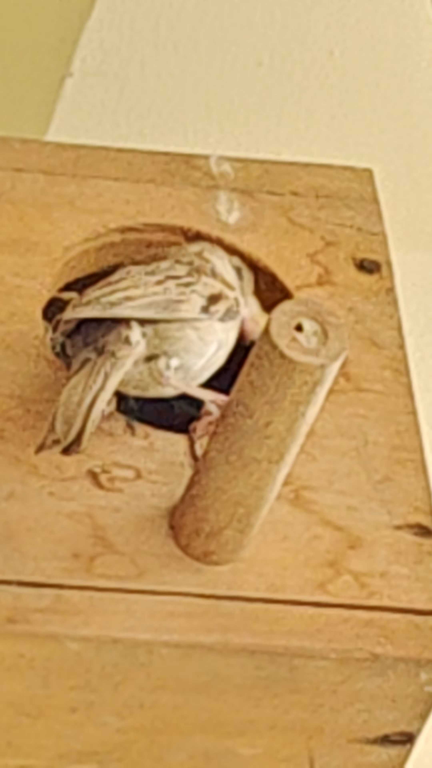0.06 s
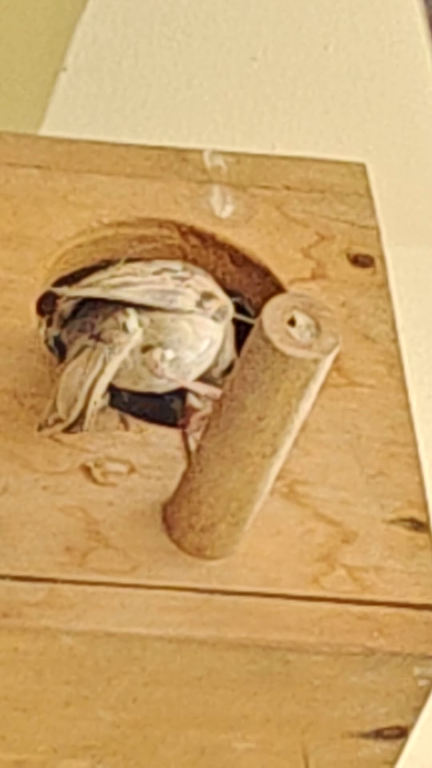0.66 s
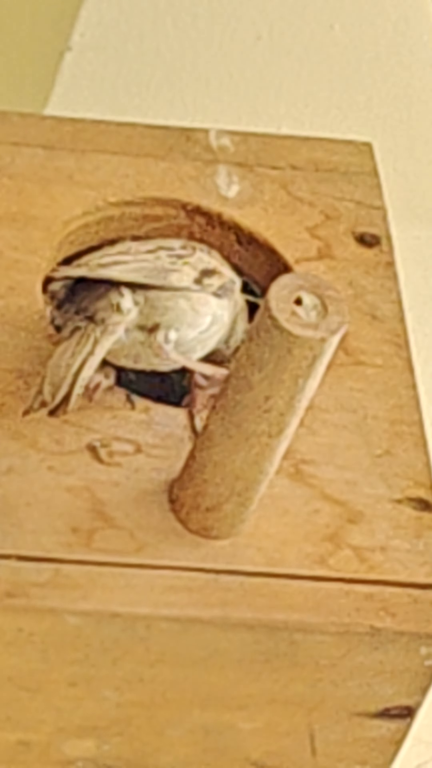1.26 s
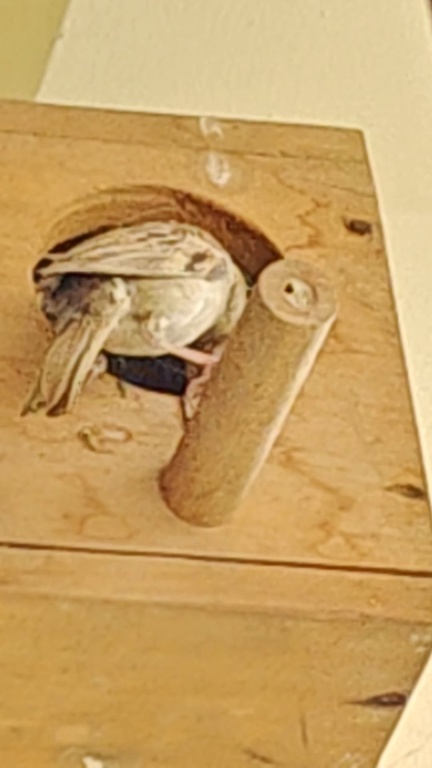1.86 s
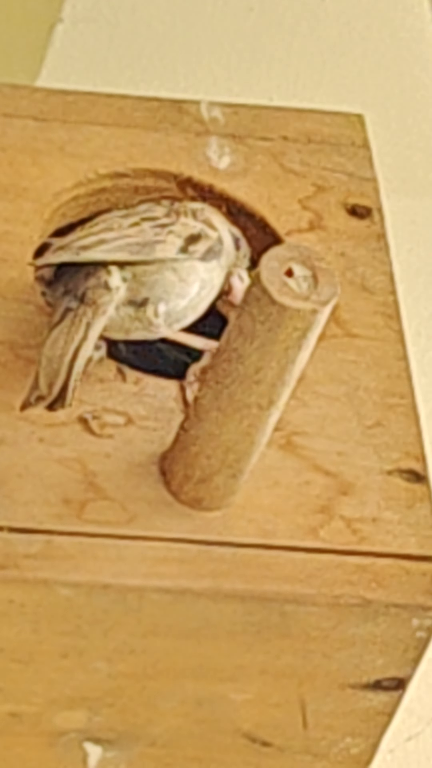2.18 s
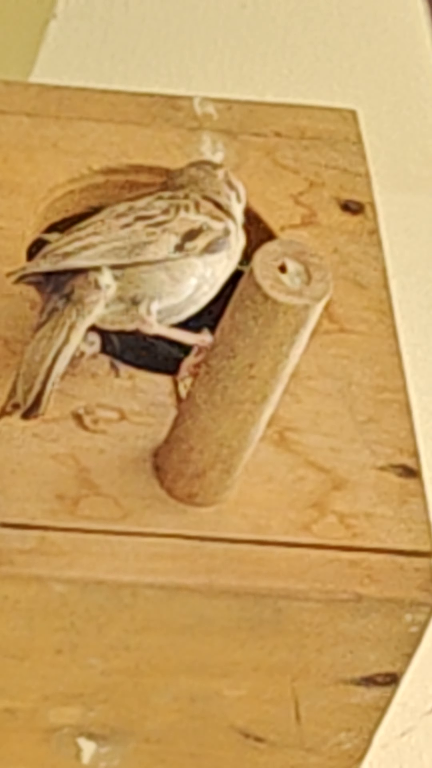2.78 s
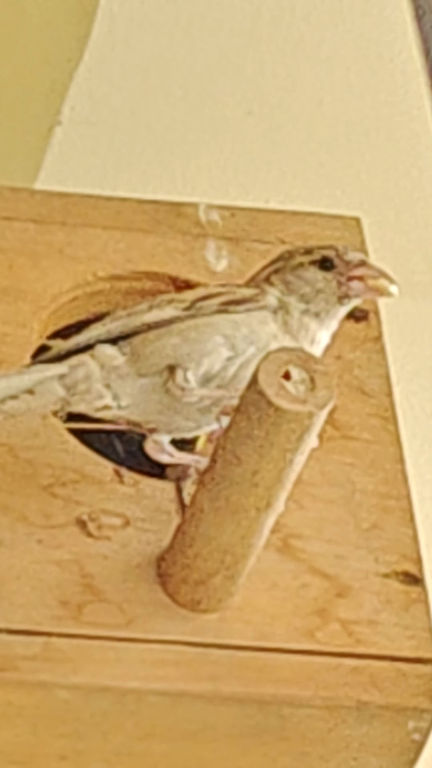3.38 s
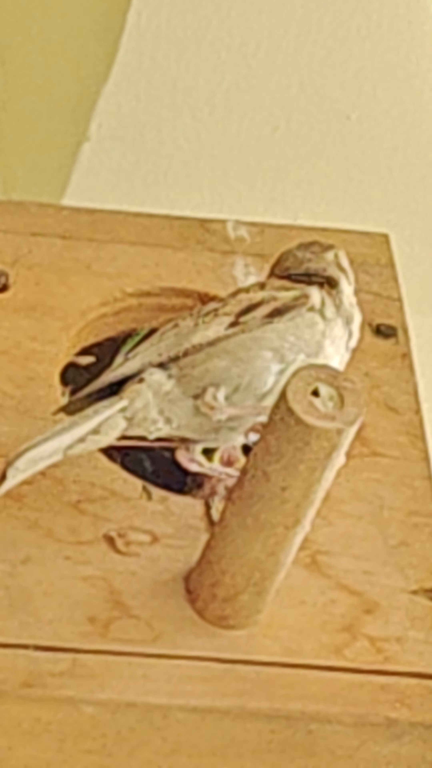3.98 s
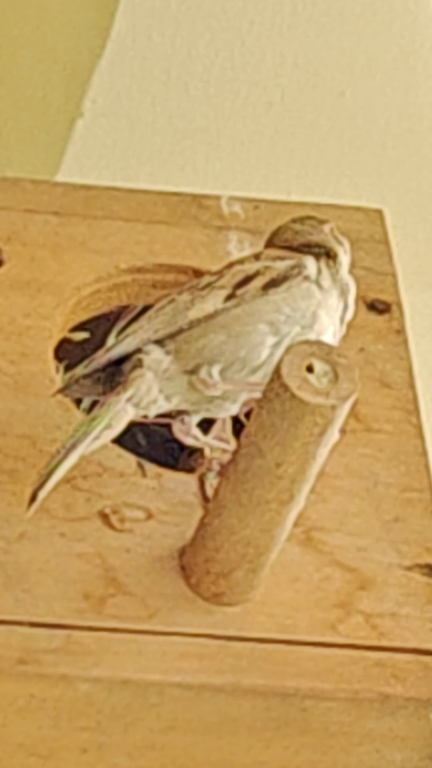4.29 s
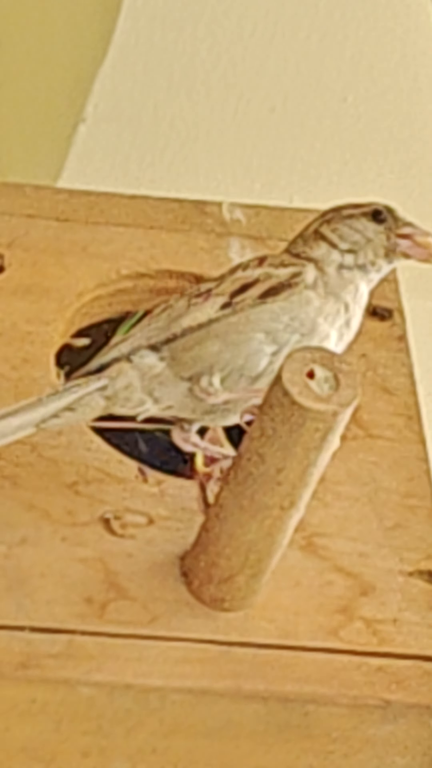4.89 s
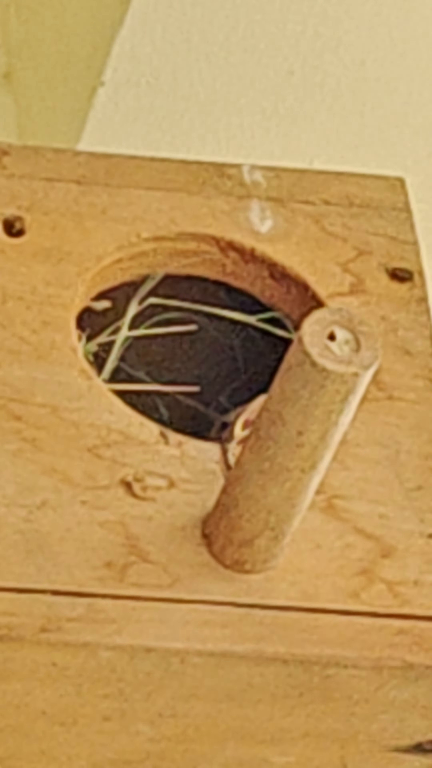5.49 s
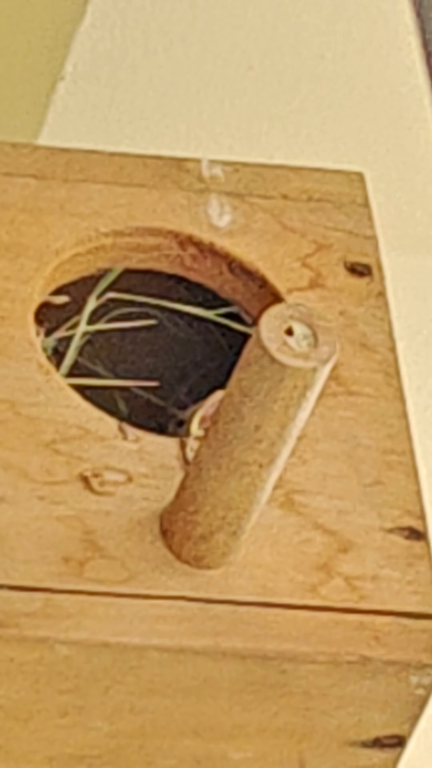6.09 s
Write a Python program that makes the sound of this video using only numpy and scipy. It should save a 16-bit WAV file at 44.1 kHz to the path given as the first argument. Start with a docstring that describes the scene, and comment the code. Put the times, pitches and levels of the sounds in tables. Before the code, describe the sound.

Close to a wooden nest box outdoors, baby sparrows give spaced, high, scratchy chirps and peeps with a slight boxy ring. A parent's claws tick faintly on the wood and thin pips sound farther off. Midway, quick rasping churrs start crowding in between the chirps. Two dull, soft bumps occur, and another bird gives one faint downward whistle near the end. A low rumble and distant machine hum stay underneath.

```python
"""Hoarse chirps and single peeps ring from a wooden nest box under a roof: sparrow nestlings are begging.
Each syllable is a frequency-modulated whistle of the syrinx, with turbulent hiss. Two patterns of chirp
repeat; from about halfway, raspy churrs join in. Reflections from the box and the walls smear the calls.
A parent's claws tick at the hole; two soft thumps, thin pips and one falling whistle in the open sound
over a faint outdoor rumble and hum."""
import sys
import numpy as np
from scipy import signal
from scipy.fft import rfft, irfft, next_fast_len
from scipy.io import wavfile
from scipy.ndimage import uniform_filter1d, map_coordinates

SR = 44100
rng = np.random.default_rng(int(sys.argv[2]) if len(sys.argv) > 2 else 0)


def wav_record(signal):
    """Record a signal, one row per channel, as 16-bit PCM in the file named by sys.argv[1]."""
    frames = np.transpose(np.atleast_2d(signal))
    bounded = np.clip(frames, -1, 1)
    # unit amplitude maps onto the largest positive 16-bit level
    quanta = np.round(bounded * 32767).astype(np.int16)
    wavfile.write(sys.argv[1], SR, quanta)


N = 275606

# gently falling pitch contour of squeaks and thin pips: length_share, pitch_ratio
FALL_SHAPE = [(0, 1.07), (.4, 1.0), (1, .94)]


def syrinx(length, hz, hoarse, shape, harmonics_db, jitter, rise, fall, flutter_rate=1300, shimmer=0.49):
    """A gliding harmonic tone and its envelope; random frequency and amplitude modulation make it hoarse."""
    count = int(length * SR)
    progress = np.linspace(0, 1, count)
    contour = uniform_filter1d(np.interp(progress, *np.transpose(shape)), size=160)
    wobble = 0.0239 * np.sqrt(2 * hoarse) * wander(count, 302)
    flutter = jitter * hoarse * wander(count, flutter_rate)
    pitch = hz * contour * (1 + wobble + flutter)
    phase = 2 * np.pi * np.cumsum(pitch) / SR
    tone = np.zeros(count)
    for k, db in enumerate(harmonics_db, 1):
        beak_db = 2.5 * (k > 1) * wander(count, 150)  # overtones come and go as the beak moves
        tone += undb(db + beak_db) * (k * pitch < SR / 2) * np.sin(k * phase)
    envelope = swell(progress, rise, fall) * unit(np.exp(shimmer * hoarse * wander(count, 800)))
    return unit(tone) * envelope, envelope


def syllables(notes, shape, overtones_db, hiss_db, jitter=0.066):
    """Whistles of three harmonics, with turbulence noise in proportion to their hoarseness."""
    # spectrum of the turbulence: frequency_hz, gain_db
    turbulence = [(2800, -26), (3500, -11), (4200, -5), (7000, -4), (9000, 0), (12000, -1), (16000, -3)]
    voice, air = np.zeros(N), np.zeros(N)
    for start, length, hz, db, hoarse in notes:
        tone, envelope = syrinx(length, hz, hoarse, shape, (0, *overtones_db), jitter, rise=.17, fall=.13)
        add(voice, start, undb(db) * tone)
        add(air, start, undb(db + hiss_db) * hoarse * envelope)
    return voice + hiss(air, turbulence, soften_s=0.034)


def chirps(peep_squeaks):
    """Set patterns of frequency sweeps, one track per kind; the peeps' squeaks join the squeak track."""
    # syllables of a high two-part chirp and of a low one that steps down:
    # delay_s, length_s, pitch_hz, level_db, hoarseness, kind
    high_pattern = [(.001, 0.036, 7400, -11.5, 0.5, "squeak"), (.008, 0.02, 8120, -6, .4, "flick"),
                    (0.017, 0.055, 6440, -0.5, 0.4, "arch"), (0.064, .06, 6760, -7, 0.69, "squeak"),
                    (0.108, .052, 5930, -2.5, 0.23, "slur"), (0.122, .04, 6870, -10.5, 0.58, "squeak")]
    low_pattern = [(.002, .04, 6300, -8, .45, "squeak"), (0.031, 0.026, 5960, -5, .18, "flick"),
                   (0.048, .058, 5003, -.5, .33, "arch"), (0.093, .03, 6550, -8.5, 0.69, "squeak"),
                   (.112, .026, 5700, -3.5, .1, "flick"), (0.13, .035, 4400, 0, 0.41, "slur")]
    # occurrences of each pattern: start_s, level_db
    high_calls = [(.135, -17.5), (.660, -16), (1.265, -15), (2.034, -18.5), (2.626, -17), (3.215, -16),
                  (4.227, -16), (4.892, -15)]
    low_calls = [(3.874, -14.5), (4.376, -14.5), (5.081, -16.5)]
    # pitch contours (a quick rise, a rise and fall, a rise that levels off): length_share, pitch_ratio
    flick = [(0, .86), (.5, .97), (1, 1.2)]
    arch = [(0, .62), (.24, .92), (.48, 1.0), (.72, 1.01), (.87, .82), (1, .62)]
    slur = [(0, .72), (.33, .92), (.65, 1.0), (1, 1.02)]
    notes = {"flick": [], "arch": [], "slur": [], "squeak": []}
    for calls, pattern in ((high_calls, high_pattern), (low_calls, low_pattern)):
        for start, call_db in calls:
            for delay, length, hz, db, hoarse, kind in pattern:
                notes[kind].append((start + delay, length, hz, call_db + db, hoarse))
    notes["squeak"] += peep_squeaks
    return (syllables(notes["flick"], flick, overtones_db=(-12.5, -30), hiss_db=9.5, jitter=0.104),
            syllables(notes["arch"], arch, overtones_db=(-13, -21), hiss_db=0, jitter=0.149),
            syllables(notes["slur"], slur, overtones_db=(-15, -18), hiss_db=-10, jitter=0.15),
            syllables(notes["squeak"], FALL_SHAPE, overtones_db=(-32, -30), hiss_db=1.5, jitter=0.1273))


def peeps(hoarse=.22, squeak_ratio=1.43, squeak_db=-12, squeak_hoarse=0.427, overhang_s=0.016):
    """Biphonation: a track of peeps from one side of the syrinx, and squeak notes for the other side."""
    # single peeps: start_s, length_s, pitch_hz, level_db
    calls = [(0.119, 0.0321, 4890, -17.5), (0.201, 0.029, 4690, -21.5), (1.214, .04, 4898, -17),
             (2.702, .05, 5020, -21), (2.774, 0.022, 4920, -19), (3.583, 0.0443, 5120, -20),
             (3.666, 0.0277, 4740, -19), (4.057, 0.034, 4116, -18), (4.844, 0.034, 4950, -19)]
    # their pitch contour: length_share, pitch_ratio
    contour = [(0, .84), (.22, 1.1), (.42, 1.03), (.7, .98), (1, .97)]
    notes = [(*call, hoarse) for call in calls]
    squeaks = [(start - overhang_s, length + 2 * overhang_s, squeak_ratio * hz, db + squeak_db,
                squeak_hoarse) for start, length, hz, db in calls]
    return syllables(notes, contour, overtones_db=(-12.5, -19), hiss_db=-1, jitter=0.152), squeaks


def churrs(full_db=-15, full_length_s=.057, hoarse=.75, rattle_hz=420):
    """Uneven amplitude modulation roughens low notes that are strongest in their second harmonic."""
    # churrs: start_s, fundamental_hz, level_db
    calls = [(2.764, 2540, -27.5), (2.846, 2210, -31.5), (2.956, 2570, -31), (3.073, 3200, -27),
             (3.275, 2480, -21.5), (3.355, 2016, -23), (3.478, 3400, -14.5), (3.669, 3500, -17.5),
             (3.749, 2196, -19.5), (3.863, 2805, -15.5), (4.119, 3060, -11.5), (4.211, 3150, -13.5),
             (4.388, 2833, -15.5), (5.044, 2900, -18.5), (5.135, 2350, -20.5), (5.282, 2850, -18.5),
             (5.413, 2847, -16.5), (5.538, 2900, -17), (5.674, 3060, -16), (5.866, 3114, -19),
             (6.028, 3280, -25)]
    # their pitch contour: length_share, pitch_ratio
    contour = [(0, .82), (.26, 1.07), (.55, 1.01), (1, .75)]
    # spectrum of their coarse rasp: frequency_hz, gain_db
    rasp = [(1400, -49), (2000, -9), (2500, -8), (3200, -10), (4500, -5), (7000, -5.5), (9500, -7),
            (15000, -15.5)]
    voice, air = np.zeros(N), np.zeros(N)
    for start, hz, db in calls:
        slack_db = full_db - db  # a weaker churr is shorter and keeps more of its fundamental
        length = full_length_s * np.exp(-0.01586 * slack_db)
        harmonics_db = (-9 + 0.47 * slack_db, 0, -10, -15, -20)
        tone, envelope = syrinx(length, hz, hoarse, contour, harmonics_db,
                                jitter=.062, rise=.32, fall=.2, flutter_rate=1500, shimmer=.45)
        rattle_phase = 2 * np.pi * np.cumsum(rattle_hz * (1 + 0.309 * wander(len(tone), 172.3))) / SR
        add(voice, start, undb(db - 6.5) * tone * (1 + .5 * np.sin(rattle_phase)))
        add(air, start, undb(db - 9.5) * envelope)
    return voice + hiss(air, rasp, soften_s=0.021)


def hiss(envelope, spectrum, soften_s):
    """A soft hiss swells around each note and fades; each band has its own random amplitude modulation."""
    for _ in range(3):
        envelope = uniform_filter1d(envelope, int(soften_s * SR))
    noise, ragged = colour(rng.standard_normal(N), spectrum), np.zeros(N)
    for band_hz in ((1000, 4500), (4500, 8000), (8000, 10000), (10000, 12500), (12500, 17000)):
        gains = undb(3 * rng.standard_normal(N // 300 + 1))
        flutter = np.interp(np.arange(N), np.arange(0, N, 300), gains)
        ragged += flutter * signal.sosfilt(butter(3, band_hz, "band"), noise)
    return envelope * unit(ragged)


def nest_box(seats, shelf_hz=8500):
    """Each seat in the box has its own impulse response; all the calls share one tone colour."""
    # overall tone colour of the calls, with a dip near 8 kHz: frequency_hz, gain_db
    tone_colour = [(1200, -36), (2000, 3), (2900, 3), (4000, 4), (5600, 1.5), (7300, 4.5), (8100, -4),
                   (9200, -0.5), (10200, -1), (11500, -6), (13000, -8), (16000, -8)]
    # the treble brightens and dulls: time_s, gain_db
    brightness = [(0, 3), (0.699, -8), (1.3, -5.5), (2.1, 4), (2.9, -3.5), (3.75, 5), (4.4, -5), (5.7, 0.5),
                  (6.25, 5)]
    calls = sum(reverberation(undb(1.5) * colour(voice, tone_colour)) for voice in seats)
    treble = signal.sosfiltfilt(butter(2, shelf_hz, "high"), calls)
    treble_gain = undb(np.interp(np.arange(N) / SR, *np.transpose(brightness)))
    return calls + treble * (treble_gain - 1)


def reverberation(x, box=(0, 0.11), walls=(-6, 0.2), yard=(-23, 0.44), absorb_hz=8000):
    """Convolution with a direct path and three exponentially decaying tails, each (level_db, t60_s)."""
    # level difference between the sides: frequency_hz, left_minus_right_db
    tilt = [(2000, -7.5), (3000, 1), (4200, 1.5), (5200, -10), (6500, -7.5), (8000, -7), (10000, -2),
            (13000, -6)]
    t = np.arange(int(.7 * SR)) / SR
    response = np.zeros((2, len(t)))
    response[0, 0] = response[1, 20] = 1  # the direct sound reaches the left first
    noise = rng.standard_normal((3, 2, len(t)))
    noise[1:] = signal.sosfilt(butter(1, absorb_hz, "low"), noise[1:])  # walls and yard sound duller
    for echoes, (db, t60_s), build_s in zip(noise, (box, walls, yard), (.001, .008, .03)):
        tail = echoes * np.exp(-np.log(1000) * t / t60_s) * (1 - np.exp(-t / build_s))
        response += undb(db) * np.sqrt(2) * tail / np.linalg.norm(tail)
    response /= np.linalg.norm(response, axis=1, keepdims=True)
    left, right = signal.fftconvolve(x[None], response, axes=1)[:, :N]
    return np.array([colour(left, [(hz, db / 2) for hz, db in tilt]),
                     colour(right, [(hz, -db / 2) for hz, db in tilt])])


def claws(decay_s=0.004, low_cut_hz=6000):
    """Impacts of claws on the wooden rim: bright noise transients that decay exponentially."""
    # ticks: start_s, level_db
    ticks = [(0.358, -31.5), (2.226, -31), (2.235, -29.5)]
    out, t = np.zeros(N), np.arange(SR // 50) / SR
    for start, db in ticks:
        add(out, start, undb(db) * np.exp(-t / decay_s) * rng.standard_normal(len(t)))
    return signal.sosfilt(butter(2, low_cut_hz, "high"), out)


def thumps():
    """Low tone bursts of only a few cycles, heard as dull bumps rather than as pitches."""
    # bumps: start_s, length_s, pitch_hz, level_db
    bumps = [(2.602, 0.057, 109.6, -31.5), (5.339, 0.06, 121.5, -29.5)]
    out = np.zeros(N)
    for start, length, hz, db in bumps:
        t = np.arange(int(length * SR)) / SR
        burst = swell(t / length, rise=0.23, fall=0.18) * np.sin(2 * np.pi * hz * t)
        add(out, start, undb(db) * unit(burst))
    return out


def open_whistle():
    """A bird in the open gives one downward glide, almost a pure tone."""
    # the whistle: start_s, length_s, pitch_hz, level_db, hoarseness
    notes = [(5.584, .118, 4880, -30.5, .06)]
    # its pitch contour: length_share, pitch_ratio
    contour = [(0, 1.09), (.3, 1.03), (.68, .98), (1, .89)]
    return syllables(notes, contour, overtones_db=(-37, -50), hiss_db=-15)


def thin_pips(hoarse=.06):
    """Nearly sinusoidal tones: thin pips, and a faint ring near 1.5 s that follows a chirp."""
    # pips and the ring: start_s, length_s, pitch_hz, level_db
    pips = [(0.418, .018, 4240, -43), (0.502, 0.02, 4250, -47), (1.5, 0.054, 5300, -43),
            (1.814, 0.018, 5120, -39.5), (1.843, 0.017, 6370, -30.5), (1.937, .06, 4790, -39.5),
            (1.966, 0.03, 6320, -32), (2.482, 0.0385, 4760, -44)]
    return syllables([(*pip, hoarse) for pip in pips], FALL_SHAPE, overtones_db=(-40, -50), hiss_db=-15)


def outdoors(rumble_db=-36, hush_db=-55, low_cut_hz=26):
    """Ambient noise: a rumble coherent between the ears in the bass, a machine hum and a high hush."""
    # spectrum of the rumble: frequency_hz, relative_db
    spectrum = [(15, -37), (25, -9.5), (64, -5.5), (127, -0.5), (170, -2.5), (326, -7.5), (516, -14.5),
                (677, -14), (3620, -25.5), (3920, -26.5), (4610, -29), (5430, -31.5), (8140, -47),
                (9320, -46.5), (16000, -66)]
    # its stereo width: frequency_hz, side_minus_mid_db
    width = [(60, -30), (160, -31), (330, -14.5), (600, 3), (1500, 3.5), (3000, 0.5), (10000, 0)]
    # partials of a distant machine: pitch_hz, level_db
    partials = [(120, -47.5), (199, -49.5), (333.8, -50.5), (667.5, -59)]
    mid, side = (unit(colour(rng.standard_normal(N), spectrum)) for _ in range(2))
    stereo = mid + colour(side, width) * np.array([[1], [-1]])
    rumble = undb(rumble_db + .5 * wander(N, 3.45)) * stereo
    rumble = signal.sosfilt(butter(2, low_cut_hz, "high"), rumble)
    hum, t = np.zeros(N), np.arange(N) / SR
    for hz, db in partials:
        amplitude = np.sqrt(2) * undb(db + 2 * wander(N, 3.833))
        hum += amplitude * np.sin(2 * np.pi * hz * t + 0.93 * wander(N, 8))
    hush = colour(rng.standard_normal((2, N)), [(2000, -7), (4200, 4.5), (7200, 4.5), (8200, -11.5)])
    return rumble + hum + undb(hush_db) * unit(hush)


def undb(db):
    """Decibels to amplitude ratio."""
    return 10 ** (np.asarray(db) / 20)


def unit(x):
    """Normalise to rms 1."""
    return x / np.sqrt(np.mean(x ** 2))


def butter(order, hz, kind):
    """Sections of a maximally flat filter."""
    return signal.butter(order, hz, kind, fs=SR, output="sos")


def colour(x, points):
    """Zero-phase filtering by a curve of (frequency_hz, gain_db) points."""
    hz, db = np.transpose(points)
    size = next_fast_len(N + 4096)
    bins_hz = np.arange(size // 2 + 1) * SR / size
    gain = undb(np.interp(np.log(bins_hz + 1), np.log(hz), db))
    return irfft(rfft(x, size) * gain, size)[..., :N]


def wander(count, rate):
    """Smooth random modulation with `rate` new values a second and a spread near 1."""
    place = np.arange(count) * rate / SR
    return map_coordinates(rng.standard_normal(2048), [place + 2], order=3, mode="wrap")


def swell(progress, rise, fall):
    """Sine-squared envelope; rise and fall are shares of the note's length."""
    opening = np.sin(np.pi / 2 * np.clip(progress / rise, 0, 1))
    closing = np.sin(np.pi / 2 * np.clip((1 - progress) / fall, 0, 1))
    return (opening * closing) ** 2


def add(track, start_s, sound):
    """Superpose a sound on a track."""
    i = int(start_s * SR)
    track[i:i + len(sound)] += sound[:N - i]


def scene():
    """The direct-to-reverberant ratio places each source: the pips are mostly echo, claws are drier."""
    peep_voice, peep_squeaks = peeps()
    flicks, arches, slurs, squeaks = chirps(peep_squeaks)
    seats = (peep_voice + flicks, arches, slurs + squeaks, churrs())
    pips = thin_pips()
    near = nest_box(seats)
    ticks = claws()
    far = reverberation(pips + undb(-4) * ticks, box=(2.5, 0.043), walls=(-1, 0.39), yard=(1.5, 0.77))
    direct = undb(1) * ticks + open_whistle()
    return near + far + direct + thumps() + outdoors()


def record(dry):
    """Soft saturation rounds the highest peaks, and a steep low-pass filter cuts the top."""
    ceiling, top_hz = .82, 16000
    rounded = dry / (1 + (dry / ceiling) ** 8) ** (1 / 8)
    return signal.sosfiltfilt(signal.ellip(8, .1, 50, top_hz, fs=SR, output="sos"), rounded)


dry = scene()
out = record(dry)
wav_record(out)
```